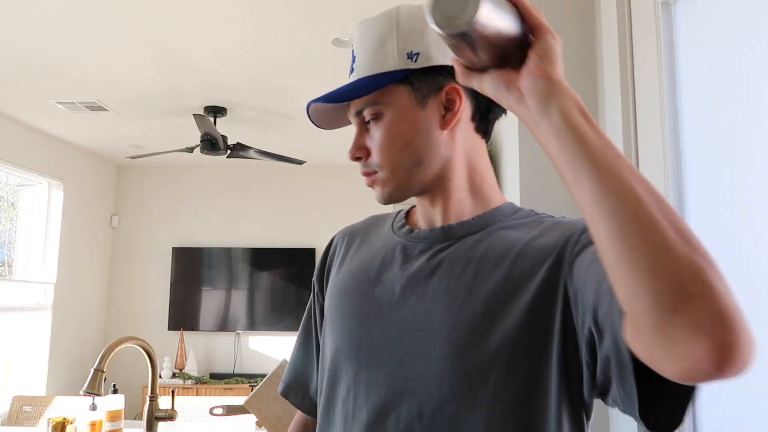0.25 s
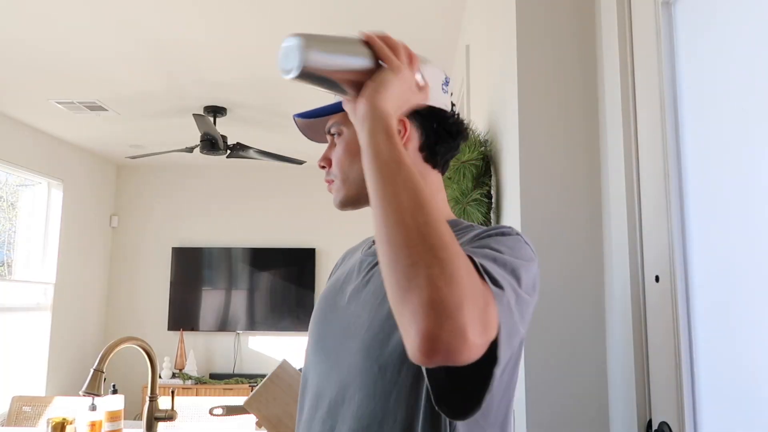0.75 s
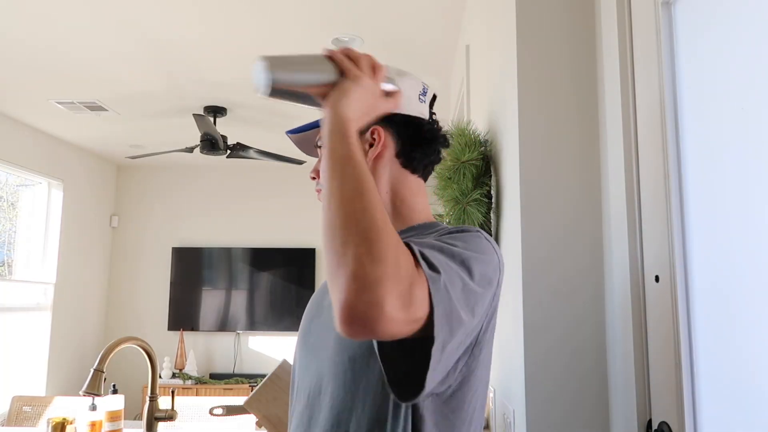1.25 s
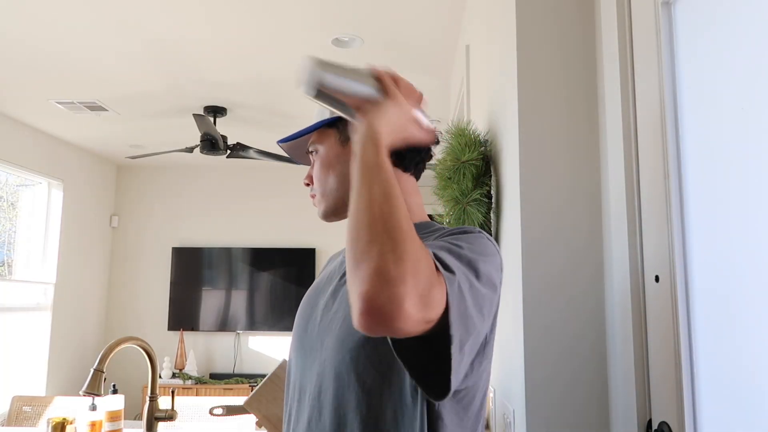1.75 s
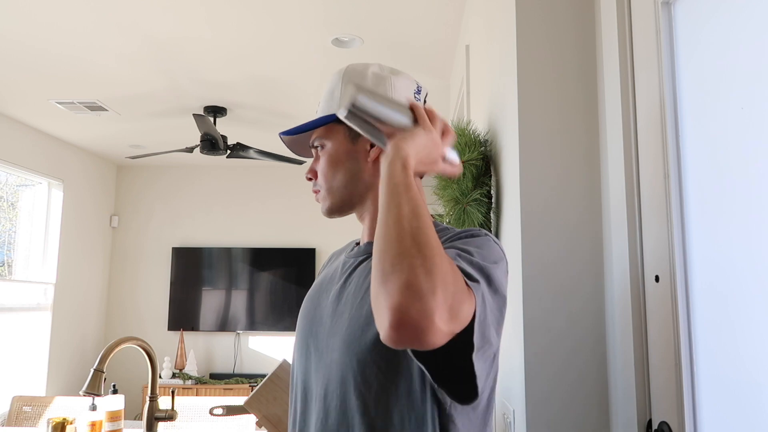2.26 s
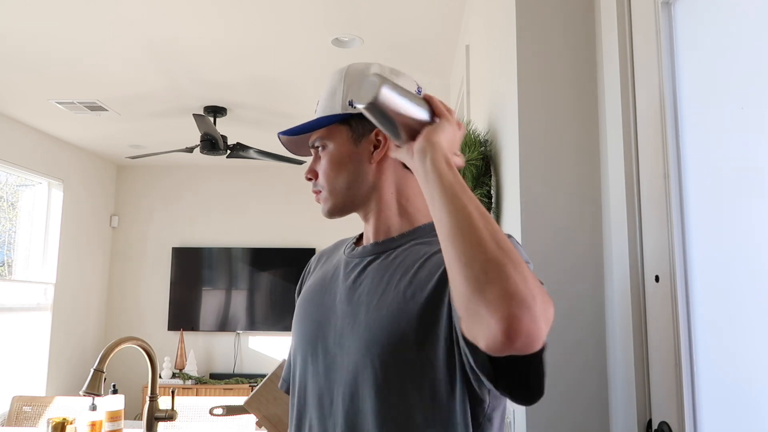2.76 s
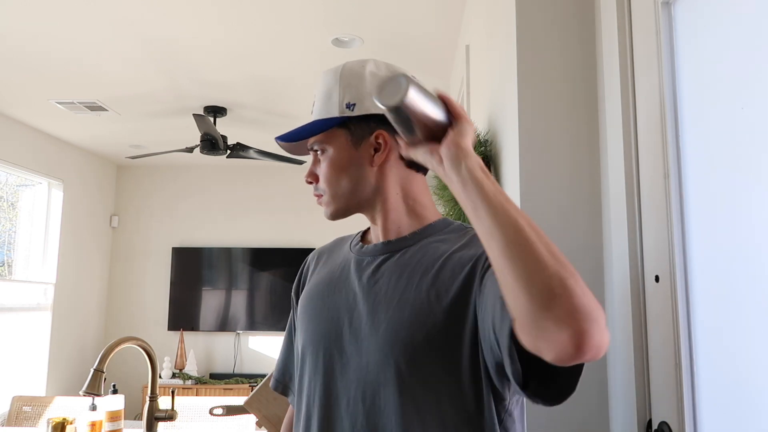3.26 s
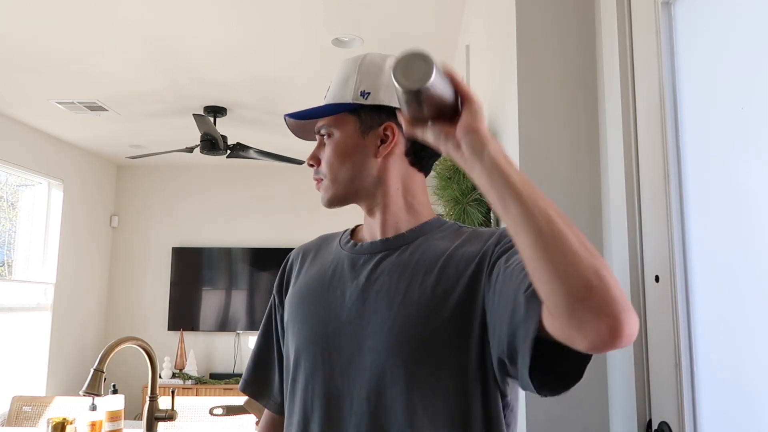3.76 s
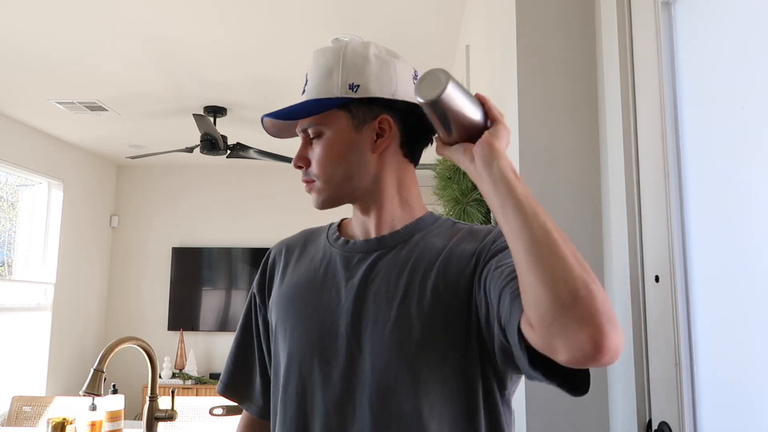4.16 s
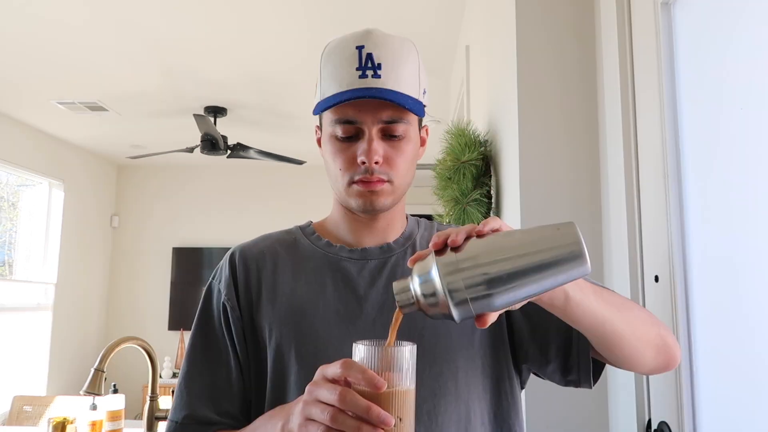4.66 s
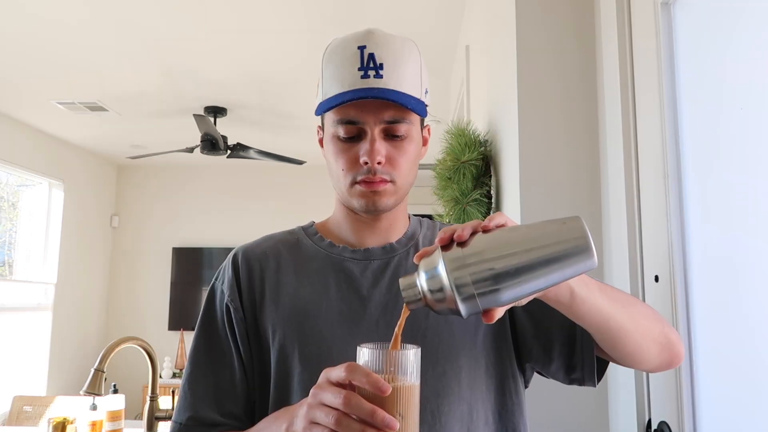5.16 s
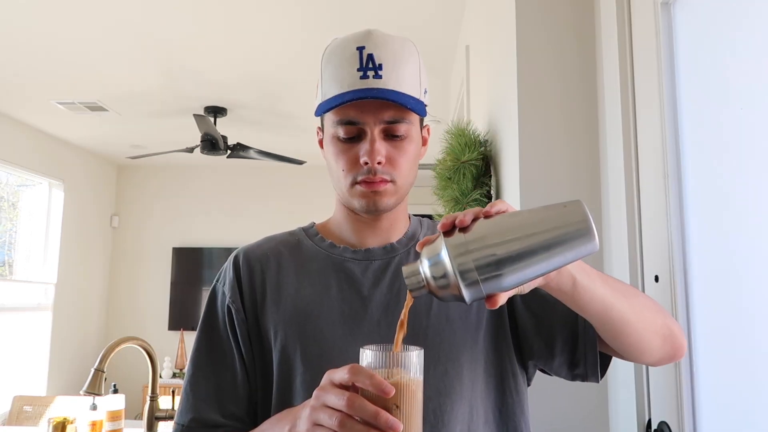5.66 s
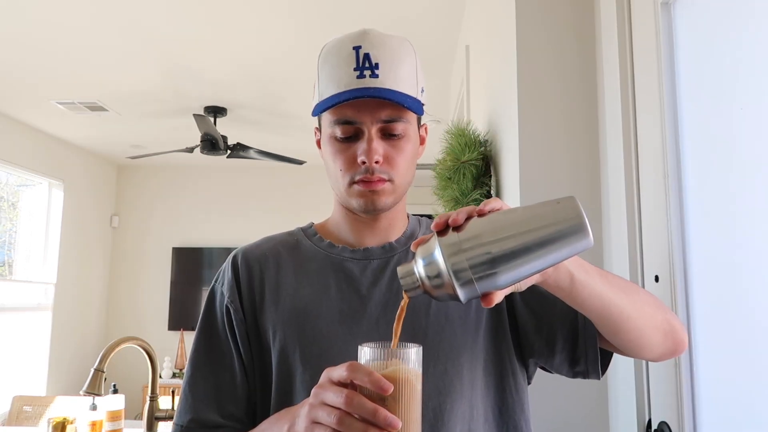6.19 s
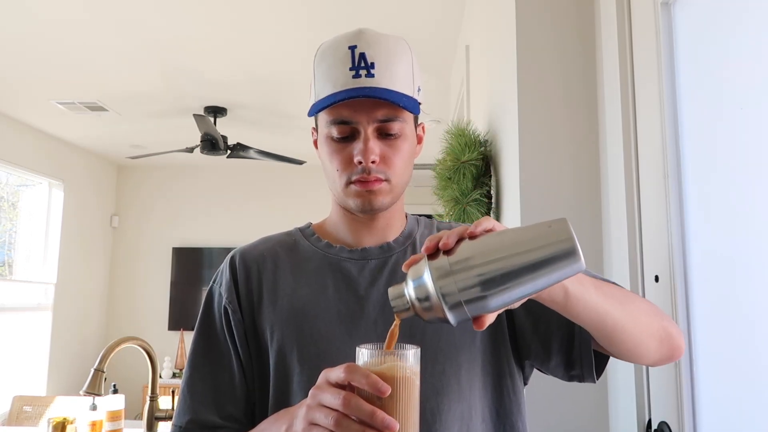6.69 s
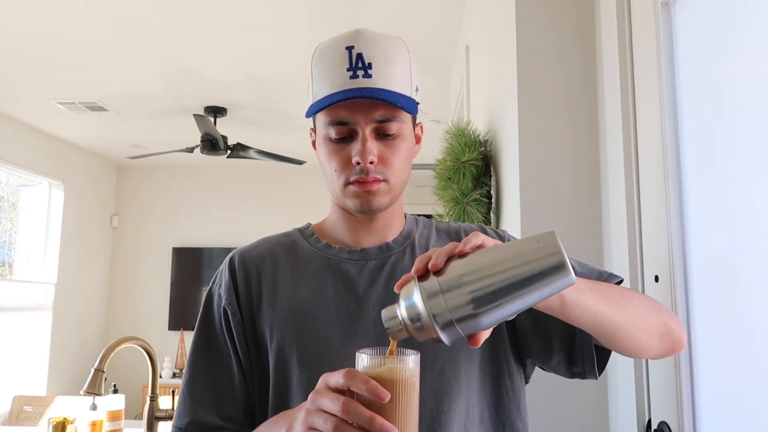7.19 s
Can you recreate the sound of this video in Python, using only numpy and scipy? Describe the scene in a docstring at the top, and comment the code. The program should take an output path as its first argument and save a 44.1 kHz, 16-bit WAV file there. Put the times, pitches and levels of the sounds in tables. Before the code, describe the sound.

From 0 to about 4.65 seconds, ice is shaken hard in a closed steel tin in a reflective kitchen. It starts slightly softer, then becomes loud and dense: around eight landings a second, each a burst of thuds, cracks, wet slosh and short hand-damped metallic ringing, mostly around 2 to 4 kHz. The strongest clatter falls between 1.1 and 3 seconds; later blows are crisper. A sudden cut brings a far quieter pour, with low appliance rumble, hiss and hum stepping up. A thin bubbling stream fills a glass, surging and rising in pitch, with fine fizz and a faint fading glass ring. A clear ice knock comes at 5.13, more clunks and glugs at 5.7 to 6.5. From 6.7 the stream dwindles, leaving tiny drips near 7.0, 7.1 and 7.4. Close stereo pickup, short room echoes.

```python
"""A hard-walled kitchen: ice rattles in a hand-held steel shaker, about four strokes each way a second.
After a cut the drink is poured into a glass: a trickle, cubes knocking in the tilted tin, glugs, late drips.
Ice blows are thuds, cracks and decaying tin modes; cracks and slosh are coloured noise and short wavelets.
The stream is rising bubble tones, splashes on the tin, a singing glass and fizz; random echoes make the room.
Behind it lie appliance rumble and hiss (shaped noise), wavering hum and a thin whine (sines)."""
import sys
import numpy as np
from scipy import signal
from scipy.io import wavfile
from scipy.ndimage import uniform_filter1d

SR = 44100
rng = np.random.default_rng(int(sys.argv[2]) if len(sys.argv) > 2 else 0)


def master_out(mix):
    """Clip the mix to full scale and print it as 16-bit PCM to the path in sys.argv[1]."""
    frames = np.transpose(np.atleast_2d(mix))
    ceiling = np.clip(frames, -1, 1)
    pcm = np.round(ceiling * 32767).astype(np.int16)
    wavfile.write(sys.argv[1], SR, pcm)


def makeup_ratio(level_db):
    """Linear amplitude ratio for a level in decibels (20 dB per factor of ten)."""
    decades = np.asarray(level_db, float) / 20
    return 10 ** decades


N = 327699
TIME = np.arange(N) / SR
CUT_S = 4.666  # the shaking stops and the pouring shot begins

# modes of the closed tin, damped by the hand: (frequency [Hz], level [dB], t60 [s])
CLOSED_TIN = [(1700, -4.5, 0.053), (1790, -1.5, 0.037), (2010, 0, 0.016), (2188, 1.5, 0.05),
              (2398, -4.5, 0.024), (3000, 5, 0.0055), (3623, 1, 0.026), (3700, -2.5, 0.016)]
# modes of the open tin: (frequency [Hz], level [dB], t60 [s])
OPEN_TIN = [(777, 0, 0.036), (1240, -3, 0.079), (1510, 1, 0.038), (1722, -3.5, 0.16), (2234, 6, 0.032),
            (2574, -3.5, 0.045), (3256, -2, 0.018), (5050, -17, 0.1)]
# how a blow sounds: reach over the modes [octaves], thud [s], ringing [dB], crack decay [s]
GRIPPED = dict(octaves=1, thud_s=0.00043, ring_db=-12, crack_s=0.0033)
TILTED = dict(octaves=0.31, thud_s=0.0008, ring_db=-7.5, crack_s=0.0039)


def evened(x):
    """Scales to rms 1."""
    return x / np.sqrt(np.mean(x ** 2) + 1e-20)


def read(points, hz):
    """Reads a spectrum on a log-frequency axis."""
    f, value = np.transpose(points)
    return np.interp(np.log(hz + 1), np.log(f + 1), value)


def colour(x, points):
    """Filters causally (minimum phase) by a spectrum in dB."""
    log_gain = np.log(makeup_ratio(read(points, abs(np.fft.fftfreq(4096, 1 / SR)))))
    response = np.exp(np.conj(signal.hilbert(log_gain)))
    return signal.oaconvolve(x, np.fft.ifft(response).real[:2048])[:N]


def bunching(depth_db, samples):
    """Gain that wanders at random by depth_db rms, smoothed over a number of samples."""
    return makeup_ratio(depth_db * evened(uniform_filter1d(rng.standard_normal(N), samples)))


def clicks(per_s, spread_db, count):
    """Sparse clicks of uneven size, dealt out over count trains."""
    size = makeup_ratio(spread_db * np.minimum(rng.exponential(1, N), 4))
    size = size * (rng.random(N) < per_s / SR)
    return size * (rng.integers(0, count, N) == np.arange(count)[:, None])


def ring(modes, spot_hz, crack_db, octaves, thud_s, ring_db, crack_s, phases, grit):
    """One blow: a short thud at the pitch of the spot, a bright crack, and the modes near that pitch ringing on."""
    t = np.arange(len(grit)) / SR
    hz, db, t60 = np.transpose(modes)
    near = makeup_ratio(db - 4.4 * (np.log2(hz / spot_hz) / octaves) ** 2)
    t_col = t[:, None]
    rings = near * makeup_ratio(-60 * t_col / t60) * np.sin(2 * np.pi * (hz * t_col + phases))
    rings = rings.sum(1) * np.minimum(t / thud_s, 1)
    thud = t / thud_s * np.exp(1 - t / thud_s) * np.sin(2 * np.pi * spot_hz * t)
    # the whole tin is pushed
    thump = t / 0.0031 * np.exp(1 - t / 0.0015) * np.sin(2 * np.pi * 520 * t)
    blow = thud + makeup_ratio(-27.0) * thump + makeup_ratio(ring_db) * rings
    bright = signal.lfilter(*signal.butter(2, [2500, 9000], "band", fs=SR), grit)
    crack = np.exp(-t / crack_s) * bright
    return blow / abs(blow).max() + makeup_ratio(crack_db) * crack


def blows(events, modes, **how):
    """Places each listed blow at its time and level."""
    out, size = np.zeros(N + SR), SR // 8
    for s, db, hz, crack_db in events:
        phases, grit = rng.random(len(modes)), rng.standard_normal(size)
        blow = ring(modes, hz, crack_db, phases=phases, grit=grit, **how)
        out[round(s * SR):][:size] += makeup_ratio(db) * blow
    return out[:N]


def hail(modes, per_s, spread_db, crack_db, favour_db=0, **how):
    """Random small blows all over one object, each spot pitched at one of its modes."""
    trains = clicks(per_s, spread_db, count=len(modes)) * makeup_ratio(favour_db)
    total = np.zeros(N)
    for train, (hz, db, _) in zip(trains, modes):
        shape = makeup_ratio(db) * blows([(0, 0, hz, crack_db)], modes, **how)[:SR // 8]
        total += signal.oaconvolve(train, shape)[:N]
    return evened(total)


def hard_knocks():
    """The hardest single knocks of a cube on the wall of the closed tin, each exciting nearby modes."""
    # (time [s], peak level [dB], pitch of the struck spot [Hz], bright crack against the peak [dB])
    knocks = [(0.1233, -5.5, 2120, -19), (0.3375, -10.5, 2180, -20), (0.3868, -5, 2250, -20.5),
              (0.4802, -12.5, 3460, -28), (0.618, -11.5, 2030, -23), (0.7183, -3.5, 3600, -24),
              (0.8914, -7, 2480, -13), (0.9973, -3.5, 3600, -12.5), (1.1061, -5, 2260, -30),
              (1.4612, -7.5, 3520, -18), (1.5904, -5, 2170, -20.5), (1.6129, -3, 3700, -25),
              (1.7359, -6, 1910, -19), (1.8435, 0, 3700, -28.5), (1.9194, -8, 4200, -14),
              (1.9359, -8, 3600, -22), (2.0296, -9, 2300, -15), (2.2717, -16, 2190, -17.5),
              (2.3185, -5.5, 2320, -24), (2.3528, -2, 3740, -14.5), (2.5465, -8, 2060, -33.5),
              (2.737, -11.5, 2920, -20), (2.7603, -3.5, 2160, -14), (2.8418, -11, 1990, -1.5),
              (2.9834, -4.5, 2400, -7.5), (3.0866, -2.5, 3490, -16.5), (3.1996, -4.5, 2200, -16),
              (3.6688, -4.5, 1950, -17), (3.6922, -9, 2050, -7.5), (3.8976, -12.5, 2480, -7.5),
              (3.9096, -9, 1410, -6), (3.9654, -25, 2010, -15), (3.9849, -6.5, 2420, -9),
              (4.0243, -6.5, 3340, -7), (4.1548, -10.5, 3520, -8.5), (4.1709, -7.5, 2420, -8),
              (4.1885, -6, 2380, -21), (4.2618, -7.5, 2220, -10), (4.3897, 0.5, 2800, -9),
              (4.3928, 1, 1960, -26), (4.6583, -10.5, 3000, -37)]
    return blows(knocks, CLOSED_TIN, **GRIPPED)


def strokes():
    """Loudness of the moving ice: every landing swells fast, holds and settles."""
    # strokes throw the ice against one end of the tin: (landing [s], level [dB], clatter lasts [s])
    landings = [(.02, -37, 0.019), (.128, -26, 0.076), (.26, -29, 0.0048), (.342, -26.5, 0.065),
                (.485, -24.5, .02), (.615, -22, 0.057), (.72, -21.5, 0.014), (.79, -23.5, 0.0055),
                (.89, -22.5, 0.037), (1.0, -23, 0.041), (1.11, -18, 0.091), (1.225, -17.5, 0.052),
                (1.335, -17, 0.048), (1.46, -16.5, 0.051), (1.59, -19, .025), (1.71, -14, 0.01),
                (1.8, -15, 0.029), (1.91, -21, .03), (2.03, -22, 0.036), (2.17, -19.5, 0.011),
                (2.255, -20.5, 0.087), (2.41, -23.5, 0.039), (2.545, -19, 0.016), (2.62, -15, 0.012),
                (2.73, -19, 0.059), (2.84, -19.5, 0.043), (2.98, -21.5, 0.031), (3.09, -23, 0.024),
                (3.204, -22, 0.038), (3.29, -25.5, 0.046), (3.445, -23, 0.058), (3.545, -23, .05),
                (3.668, -22.5, 0.08), (3.765, -19.5, 0.045), (3.906, -20.5, 0.014), (3.968, -20, 0.097),
                (4.172, -23, 0.021), (4.262, -20, 0.037), (4.385, -26.5, 0.079), (4.52, -22, 0.011),
                (4.63, -23.5, .04)]
    land_db_per_s, settle_db_per_s = 792, 164
    sliding_db = -31  # ice sliding between strokes
    s, db, lasts = np.transpose(landings)[:, :, None]
    t = TIME[::100]
    before, after = np.maximum(s - t, 0), np.maximum(t - s - lasts, 0)
    shape_db = db - land_db_per_s * before - settle_db_per_s * after
    power = (makeup_ratio(shape_db) ** 2).sum(0) + makeup_ratio(sliding_db) ** 2
    return np.interp(TIME, t, np.sqrt(power))


def ice_cracks():
    """Cracks of ice on ice: short wavelets at random times, in twenty pitches."""
    t = np.arange(-300, 300) / SR
    total = np.zeros(N)
    for train, hz in zip(clicks(3000, 3.2, count=20), np.geomspace(400, 15000, num=20)):
        wavelet = np.sqrt(hz) * np.exp(-(t * hz / 1.9) ** 2) * np.sin(2 * np.pi * hz * t)
        total += signal.oaconvolve(train, wavelet, "same")
    return evened(total)


def rattle():
    """A dense hail of small knocks on the wall, plus cracks and slosh, swelling with every stroke."""
    # filter for small ice cracks and slosh: (frequency [Hz], gain [dB])
    crack_tone = [(130, -36.5), (330, -36.5), (430, -24.5), (690, -13), (1000, -14.5), (1400, -10),
                  (1750, 0.5), (2220, -1.5), (2800, -6.5), (3600, 0.5), (5200, -7), (12600, -20.5)]
    knocks = hail(CLOSED_TIN, 450, 3.07, -11.5, **GRIPPED)
    slosh = rng.standard_normal(N)
    wet = evened(colour(ice_cracks() + makeup_ratio(-4.0) * slosh, crack_tone))
    clusters = bunching(2.45, 500)  # cubes arrive in bunches
    return makeup_ratio(-5.0) * strokes() * clusters * (makeup_ratio(-3) * knocks + wet)


def bubbles(pitch_hz):
    """Gurgle: each bubble is a short decaying tone whose pitch rises."""
    out, t = np.zeros(N + 1000), np.arange(1000) / SR
    starts = np.flatnonzero(rng.random(N) < 500 / SR)  # about 500 a second
    for at, tune, size in zip(starts, *rng.standard_normal((N // 20, 2)).T):
        f = pitch_hz[at] * np.exp(0.254 * tune)
        swell = t * f * np.exp(-t * f / 4)
        out[at:at + 1000] += makeup_ratio(3.1 * size) * swell * np.sin(2 * np.pi * f * t * (1 + 12 * t))
    return evened(out[:N])


def splashes(pitch_hz):
    """Splashes ring the open tin; modes above the bubble pitch answer less."""
    mode_hz = np.transpose(OPEN_TIN)[0][:, None]
    favour_db = -14 * np.maximum(np.log2(mode_hz / pitch_hz), 0) ** 2
    return hail(OPEN_TIN, 420, 3.2, -28.0, favour_db=favour_db, **TILTED)


def singing_glass():
    """The glass sings under the stream: one mode struck at random, fading as the drink damps it."""
    mode_hz, t60_s, fade_db_per_s = 3405, 0.025, 5.9
    t = TIME[:SR // 4]
    wall = makeup_ratio(-60 * t / t60_s) * np.sin(2 * np.pi * mode_hz * t)
    struck = signal.oaconvolve(clicks(130, 5.5, count=1)[0], wall)[:N]
    return evened(struck) * makeup_ratio(-5.5 - fade_db_per_s * (TIME - CUT_S))


def fizz():
    """Fine fizz: bright noise in clumps."""
    clumps = bunching(7.0, 900)
    tone = [(1800, -4), (4500, -0.5), (9000, -17.5)]  # (Hz, dB)
    return evened(colour(clumps * rng.standard_normal(N), tone))


def stream():
    """The stream into the glass: surging bubbles and splashes, the singing glass, and fizz."""
    # (time [s], gurgle level [dB], fizz against the gurgle level [dB], bubble pitch [Hz])
    course = [(4.67, -53.5, -11, 1385), (5.1, -49, -11, 1510), (5.6, -51, -4.5, 1620),
              (6.099, -48.5, -6.5, 1920), (6.62, -50.5, -15.5, 2350), (6.8, -60, -5.5, 2330),
              (7.43, -68, 2.5, 2350)]
    s, *columns = np.transpose(course)
    db, fizz_db, pitch_hz = (np.interp(TIME, s, column) for column in columns)
    surges = bunching(2, 1500)  # the flow glugs past the strainer
    gurgle = surges * (makeup_ratio(-2.0) * bubbles(pitch_hz) + splashes(pitch_hz))
    return makeup_ratio(db) * (gurgle + singing_glass() + makeup_ratio(fizz_db) * fizz())


def pour_events():
    """Single sounds of the pour: cubes knocking in the tilted tin, with short glugs and late drips near 2.2 kHz."""
    # (time [s], peak level [dB], main pitch [Hz], bright crack against the peak [dB])
    events = [(4.9888, -34, 2440, -31), (5.045, -32, 1440, -14), (5.1317, -14.5, 1554, -7),
              (5.1522, -25.5, 1570, -7.5), (5.2265, -29, 1540, -16.5), (5.295, -38, 4180, -5.5),
              (5.3597, -32, 1510, -32), (5.446, -28, 1550, -27), (5.5831, -34.5, 1627, -18),
              (5.7035, -22, 1690, -15), (5.7857, -29, 1580, -12), (5.8132, -24, 1510, -9.5),
              (5.8366, -23.5, 2790, -18), (5.8485, -35.5, 4870, -15), (5.9321, -25, 1460, -20),
              (6.103, -40, 6050, -12), (6.1623, -18, 1700, -45), (6.1846, -21, 1950, -39),
              (6.324, -41, 5430, -4), (6.366, -27, 2960, -19), (6.4022, -25.5, 1810, -15),
              (6.4426, -27.5, 2340, -24), (6.4835, -29.1, 2140, -24), (6.5564, -32, 2400, -23),
              (6.6892, -27, 2310, -29), (6.9595, -35.5, 2190, -20), (7.125, -40, 2280, -24),
              (7.3726, -38.5, 2210, -24)]
    return blows(events, OPEN_TIN, **TILTED)


def kitchen(x, count):
    """Near echoes and a diffuse tail; as the tin moves, the sound hands over between several such paths."""
    # decay of the room: (frequency [Hz], t60 [s])
    decay = [(300, 0.38), (2000, 0.3), (8000, 0.4)]
    # nearest surfaces: (delay [s], level [dB])
    near_echoes = [(.0031, -10), (.0055, -11)]
    # spread of the tin between the two microphone channels: (frequency [Hz], side against mid [dB])
    spread = [(60, -23), (150, -7.5), (380, -17.5), (950, -33), (2380, -25), (5980, -1), (15000, 6)]
    taps = np.zeros((count, 2, SR // 2))
    at = np.arange(300, SR // 2 - 20, 20) + rng.integers(0, 20, (count, 2, (SR // 2 - 301) // 20))
    np.put_along_axis(taps, at, rng.choice([-1., 1.], at.shape), 2)
    hz, t, z = signal.stft(taps, SR, nperseg=256)
    z = z * makeup_ratio(-60 * t / read(decay, hz)[:, None])
    tails = signal.istft(z, SR, nperseg=256)[1]
    tails *= makeup_ratio(-7.0) / np.linalg.norm(tails[0, 0])
    for path in tails:
        path[:, 0] += [1, rng.choice([-1, 1])]  # direct sound
        for s, db in near_echoes:
            delay = round(s * SR * rng.uniform(.85, 1.2))
            path[:, delay] += makeup_ratio(db) * rng.choice([-1, 1], size=2)
    turn = (TIME * 14 - np.arange(count)[:, None]) % count  # each path carries a seventh of a second
    share = np.sin(np.pi / 2 * np.minimum(turn, 2)) ** 2
    mid, other = signal.oaconvolve((share * x)[:, None], tails, axes=2).sum(0)[:, :N]
    side = colour(other, spread)
    return np.array([mid + side, mid - side])


def air():
    """Appliance rumble and hiss, narrow in the bass, wavering hum, and a thin whine following the room noise level."""
    # tone of the room noise: (frequency [Hz], level [dB per Hz])
    tone = [(25, -6.5), (50, -1), (200, -3.5), (400, -8), (1000, -19.5), (2500, -26), (10000, -39),
            (14000, -39.5)]
    # its stereo width: (frequency [Hz], side against mid [dB])
    width = [(60, -19.5), (240, -4.5), (950, -1.5), (3770, 2.5), (15000, 4)]
    # its course, lower in the shaking shot: (time [s], mid level [dB rms])
    course = [(0, -65.5), (1.2, -56.5), (4.655, -58), (4.67, -47), (7.43, -50.5)]
    # hum lines and whine: (frequency [Hz], peak against the room noise [dB], before any wavering)
    lines = [(51, -15), (97.5, -6.5), (195.5, -8.5), (13006, -20)]
    mid, side = (colour(v, tone) for v in rng.standard_normal((N, 2)).T)
    side = colour(side, width)
    noise = np.array([mid + side, mid - side]) / np.std(mid)
    waver = uniform_filter1d(rng.standard_normal((N, len(lines))), 4000, axis=0)
    hum = np.zeros(N)
    for (hz, db), w in zip(lines, waver.T):
        w = evened(w)
        level = makeup_ratio(db + 4.1 * w * (hz < 1000))  # against the room noise, only the low lines waver in level
        hum += level * np.sin(2 * np.pi * hz * TIME + w / 2)
    return makeup_ratio(np.interp(TIME, *np.transpose(course))) * (noise + hum)


def scene():
    """Two shots joined by a short cross-fade; the tin is a little to the right."""
    pouring = np.clip((TIME - CUT_S) / 0.012 + 1, 0, 1)
    shaking = rattle() + hard_knocks()
    pour = stream() + pour_events()
    tin = (1 - pouring) * kitchen(shaking, count=8) + kitchen(pouring * pour, count=4)
    return tin * makeup_ratio(np.array([[-.2], [.2]])) + air()


def top_cut(x):
    """Nothing passes above the cut-off."""
    return signal.sosfilt(signal.butter(12, 15670, fs=SR, output="sos"), x)


def record(dry):
    """The microphone rolls off above 14 kHz and peaks beyond full scale are clipped."""
    heard = signal.lfilter(*signal.butter(N=3, Wn=14000, fs=SR), dry)
    return top_cut(np.clip(heard, -1, 1))


dry = scene()
out = record(dry)
master_out(out)
```